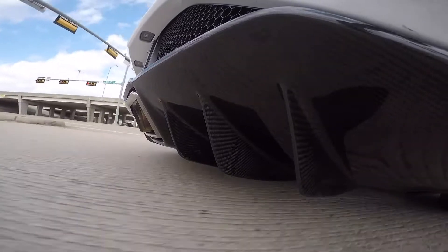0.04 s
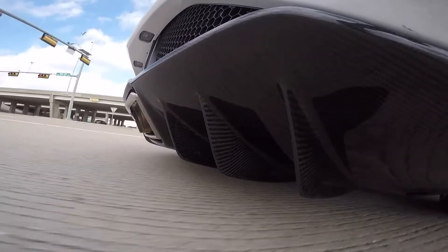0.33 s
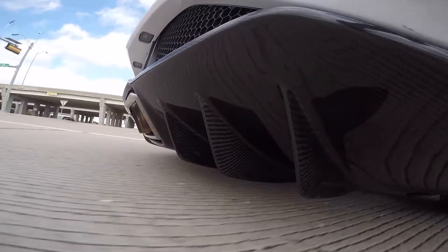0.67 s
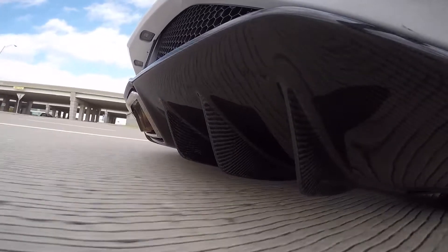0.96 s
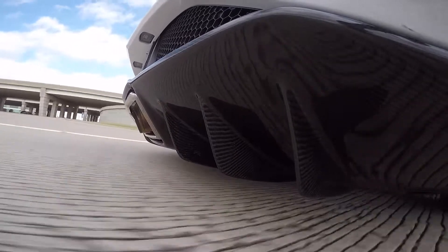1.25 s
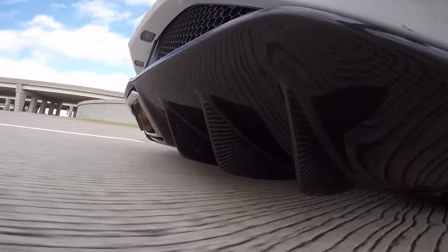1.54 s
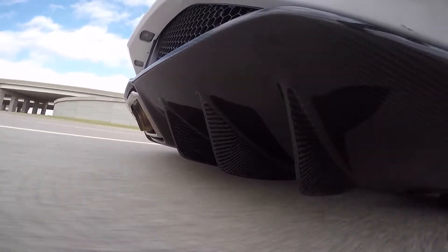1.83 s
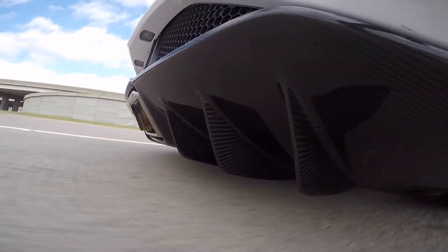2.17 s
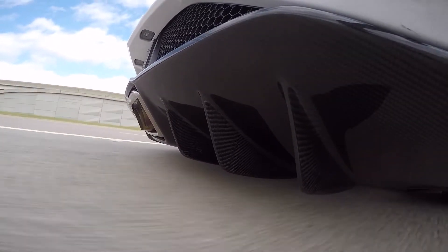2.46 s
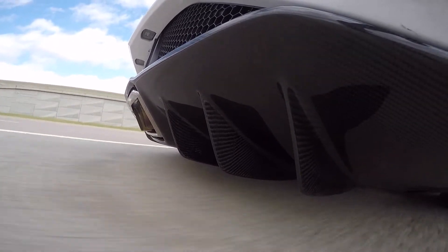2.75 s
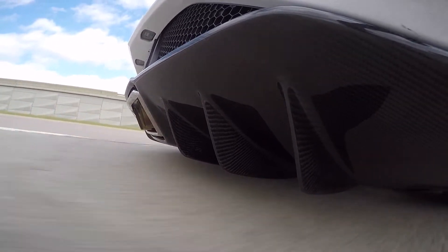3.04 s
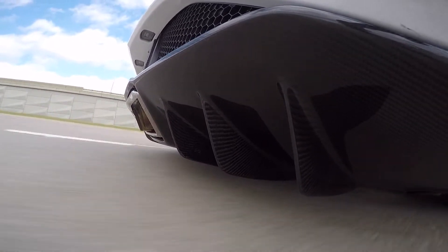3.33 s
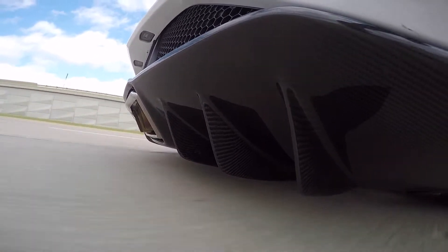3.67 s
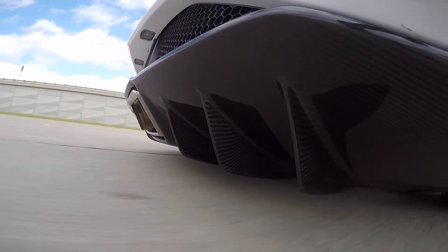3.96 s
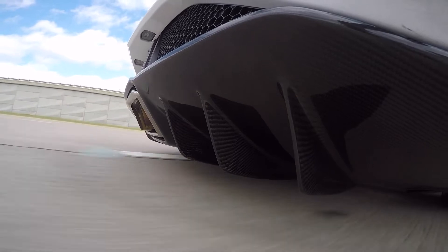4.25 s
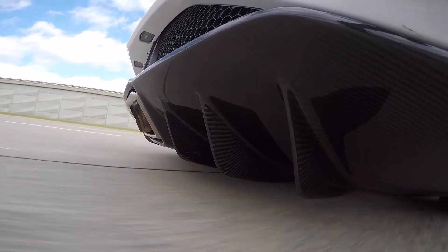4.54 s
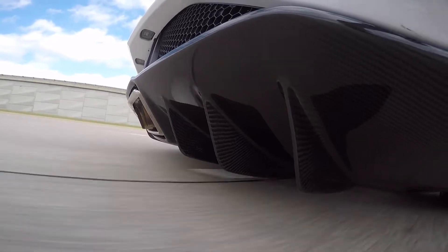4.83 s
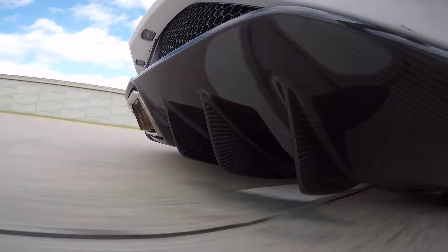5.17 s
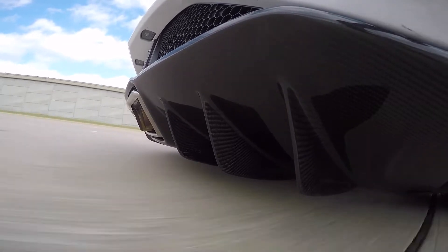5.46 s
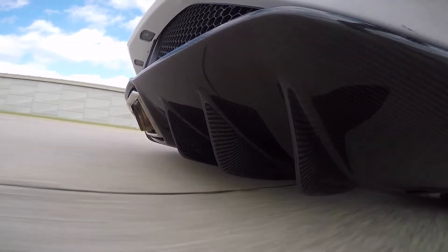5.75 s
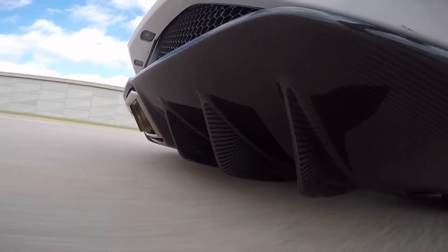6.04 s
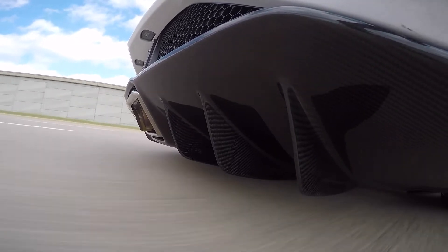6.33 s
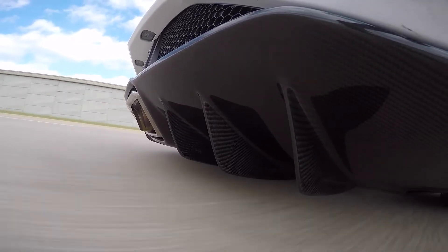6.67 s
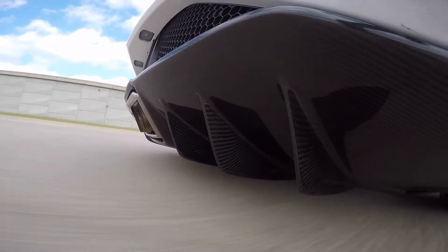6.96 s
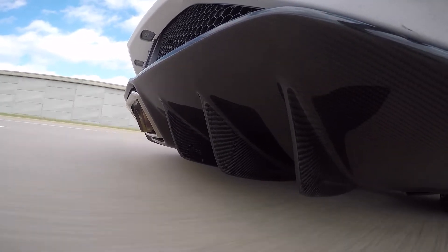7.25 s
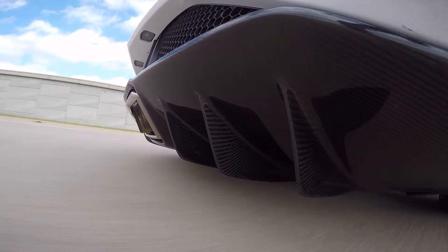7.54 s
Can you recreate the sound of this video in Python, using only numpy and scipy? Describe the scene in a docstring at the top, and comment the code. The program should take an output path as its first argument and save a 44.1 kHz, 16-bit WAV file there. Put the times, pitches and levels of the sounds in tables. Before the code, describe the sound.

A sports car accelerates hard on a concrete road, heard from its rear bumper beside the exhaust. The engine opens with a low growl and rises steadily into a loud, raspy howl over light wind and tyre noise. From about 2.5 to 2.8 seconds it stutters on the rev limiter, five quick cuts with thumps and sharp cracks, and the pitch drops with an upshift. It climbs again, stutters four times between 4.3 and 4.6 seconds, and shifts once more. A longer, slower rise follows, with brief low wind rumbles around 5.5 seconds. At 6.6 seconds a single thump and crack mark the third shift. Around 7 seconds the throttle closes, the rasp vanishes and the drone fades, returning only softly. Wind buffeting and tyre roar swell and dominate until the end near 8 seconds, with a thin, wavering gear whine.

```python
"""Twelve-cylinder sports car accelerating

The car pulls hard through three gears, heard from its tail beside the exhaust. One bank's firings
drone through the pipe and gas rasps out in step; road speed and gearing set the pitch throughout.
Twice the engine stutters on the rev limiter before a shift: each ignition cut thumps and each relight
cracks. At the end the throttle closes, and wind and tyre roar take over."""
import sys
import numpy as np
from scipy import signal
from scipy.fft import rfft, irfft
from scipy.io import wavfile
from scipy.ndimage import uniform_filter1d, minimum_filter1d

SR = 44100
rng = np.random.default_rng(int(sys.argv[2]) if len(sys.argv) > 2 else 0)


def pcm_store(signal):
    """Save signal as 16-bit PCM."""
    levels = np.round(np.clip(np.atleast_2d(signal), -1, 1) * 32767)
    wavfile.write(sys.argv[1], SR, levels.astype(np.int16).T)


N = 343980
T = np.arange(N) / SR
LIFT_S = 6.925  # the throttle starts to close

# road speed: t/s, v/(km/h)
ROAD_SPEED = [(0, 29.08), (.8, 39.5), (1.35, 49.7), (1.9, 60.9), (2.3, 72.8), (2.46, 77), (2.6, 77),
              (2.78, 74.0), (3.55, 91.5), (4.3, 108.3), (4.55, 105.8), (5.585, 122.5), (6.3, 133.7),
              (6.6, 136.4), (6.9, 139), (7.0, 134.5), (7.8, 136.3)]
# upshifts: t/s, firing rate per road speed in the new gear/(Hz per km/h)
UPSHIFTS = [(2.751, 3.55), (4.514, 2.7), (6.623, 2.2)]
# ignition cuts: cut t/s, relight t/s, thump level/dB, crack level/dB
IGNITION_CUTS = [(2.458, 2.483, 0.5, -2.5), (2.531, 2.568, -2, -0.5), (2.592, 2.654, -2, 3),
                 (2.674, 2.704, -3, 2.5), (2.748, 2.809, -7, 1), (4.298, 4.321, -0.5, -0.5),
                 (4.37, 4.419, -5, 3.5), (4.449, 4.497, -2.5, -1.5), (4.511, 4.548, -3.5, 0.5),
                 (6.624, 6.647, -0.5, 3)]
# exhaust pipe response: f/Hz, level/dB
PIPE_RESPONSE = [(30, -35), (60, -11), (90, -12.5), (125, -14), (170, -13.5), (240, -9.5), (350, -6),
                 (450, 0.5), (520, -8.5), (620, -18), (800, -13), (1100, -22), (1500, -36.5), (2200, -32)]


def drone(cycle, hz, sag, sag_db=-2.0, fall_db=-16, overrun_db=8.5, upper_share=0.44):
    """Periodic excitation: six firings a cycle give a fundamental and two overtones."""
    # strength of the fundamental: f/Hz, level/dB
    fundamental = [(145, -16.5), (163, -17.5), (192, -12.3), (225, -10.3), (245, -7), (275, -9), (320, -9),
                   (345, -10), (380, -9.9)]
    # strength of the overtones across the pipe's resonances: f/Hz, level/dB
    overtones = [(315, -22.5), (365, -12.5), (410, -13.5), (460, -15.5), (495, -19.5), (540, -28),
                 (590, -31), (650, -30.5), (700, -38), (800, -45), (1150, -44.5)]
    firing = 2 * np.pi * 6 * cycle
    # the drone fades after the lift and partly returns as the wheels drive the engine
    effort_db = sag_db * sag + fall_db * ramp(LIFT_S + 0.1, 0.17) + overrun_db * ramp(7.34, 0.19)
    tone = response(fundamental, hz) * undb(effort_db - 0.1 * walk(70)) * np.cos(firing)
    octave = response(overtones, 2 * hz) * undb(0.5 * walk(70)) * np.cos(2 * firing)
    twelfth = response(overtones, 3 * hz) * undb(0.5 * walk(70)) * np.sin(3 * firing)
    return np.sqrt(2) * (tone + undb(upper_share * effort_db) * (octave + twelfth))


def uneven_firing(cycle, hz, uneven_db, fifth_db=-20):
    """Period doubling: alternately early and late firings add lines at 1/2 and 3/2 the firing rate."""
    # boom at half the firing rate: f/Hz, level/dB
    boom = [(72, -23.5), (88, -17.5), (101, -21), (112, -30), (150, -26), (185, -22)]
    half = np.pi * 6 * cycle
    below = response(boom, hz / 2) * undb(walk(70)) * np.cos(half)
    above = response(PIPE_RESPONSE, 1.5 * hz) * undb(fifth_db + uneven_db + walk(70)) * np.cos(3 * half)
    return np.sqrt(2) * (below - above)


def burble(cycle, cycle_hz):
    """Source and filter: unequal cylinders add cycle harmonics, which swell at the pipe's resonances."""
    # engine orders: multiple of the cycle rate, level/dB
    orders = [(1, -15), (2, -15.5), (4, -21), (5, -19.5), (7, -25.5), (8, -30.5), (10, -23), (11, -22.5),
              (13, -26.5), (14, -32), (15, -26), (16, -23), (17, -26.5), (19, -34.5), (21, -31),
              (22, -28.5), (23, -29.5), (24, -24.5), (27, -24), (28, -22)]
    tilt_db = 0.3 * np.log2(cycle_hz / 56)  # high orders grow with the revs
    return sum(undb(db + k * tilt_db) * response(PIPE_RESPONSE, k * cycle_hz) * harmonic(cycle, k, 0.28)
               for k, db in orders)


def growl(cycle, cycle_hz, level_db=-34.5, hold_s=0.56, fade_db_per_s=86.5):
    """Beating: as the car pulls away, close harmonics beat at the cycle rate, then fade."""
    # orders under heavy load at low revs: multiple of the cycle rate, level/dB
    orders = [(16, -2.5), (17, 2.5), (19, -2), (21, -7.5), (22, -3.5), (23, -2.5), (24, -3), (25, -4.5)]
    # roll-off above the pipe's main resonances: f/Hz, level/dB
    rolloff = [(640, 4.5), (710, -1), (780, -22)]
    lines = sum(undb(db) * response(rolloff, k * cycle_hz) * harmonic(cycle, k, 0.091)
                for k, db in orders)
    return undb(level_db - fade_db_per_s * np.maximum(T - hold_s, 0)) * lines


def howl(cycle, hz, level_db=-35, db_per_octave=5.5, rough_db=2.5):
    """A repeating waveform has a comb spectrum; this rough one grows louder with the revs."""
    # envelope of the comb: f/Hz, level/dB
    envelope = [(450, -27.5), (650, 2), (800, -0.5), (1000, -7), (1250, -0.5), (1700, -11), (2200, -16.5),
                (3500, -37.5), (9000, -81)]
    first_gear_db = 3.5 * swell(1.87, 0.6)  # keenest in the first hard pull
    db = level_db + db_per_octave * np.log2(hz / 340) + first_gear_db
    return undb(db) * colour(repeating(cycle) * undb(rough_db * walk(110)), envelope)


def exhaust_gas(cycle, rasp_db, sizzle_db, puff=0.34, lope=0.13, spray_db=-14, flicker_db=0.78):
    """Modulated turbulence: gas puffs, strongest every second firing, ring the pipe and form a jet."""
    # lower cross modes of the tailpipe: f/Hz, bandwidth/Hz, level/dB
    rasp_modes = [(2346, 140, -4), (2944, 373, 6.5), (4410, 530, -14.5)]
    # upper cross modes: f/Hz, bandwidth/Hz, level/dB
    sizzle_modes = [(4374, 700, 0.5), (6195, 420, -4), (6563, 840, 5.5), (7420, 410, -5)]
    # spectrum of the jet: f/Hz, level/dB
    jet_spectrum = [(30, -13.5), (70, -1), (160, -4.5), (300, -3), (450, -1.5), (600, -4.5), (900, -15.5),
                    (1300, -13), (1800, -22.5), (2600, -16.5), (3700, -37.5), (8000, -52), (16000, -63)]
    # spectrum of its fine spray: f/Hz, level/dB
    spray_spectrum = [(3000, -9), (5000, 0), (8000, -4.5), (8800, -10.5), (9700, -1.5), (12000, -8.5),
                      (14000, -7.5), (16000, -18.5)]
    phase = 2 * np.pi * cycle
    gate = unit(np.exp(puff * np.cos(3 * phase) + lope * np.cos(phase)) * undb(0.5 * walk(130)))
    # each puff is partly fresh turbulence, partly the same as one cycle before
    puffs = gate * (noise() + 0.35 * repeating(cycle))
    rasp = undb(rasp_db + flicker_db * walk(40)) * ring(puffs, rasp_modes)
    sizzle_gain = undb(sizzle_db + flicker_db * walk(40))
    spray = undb(spray_db) * colour(gate * noise(), spray_spectrum)
    sizzle = sizzle_gain * (ring(puffs, sizzle_modes) + spray)
    return rasp + sizzle, colour(gate * noise(), jet_spectrum)


def firing_rate(first_gear=5.0, clutch_s=0.048, driveline_hz=2.6):
    """Firing rate is speed times gearing; each shift is a damped step response with slight undershoot."""
    gearing = old = first_gear  # Hz per km/h
    for start, new in UPSHIFTS:
        age = np.maximum(T - start, 0)
        transient = np.exp(-age / clutch_s) * np.cos(2 * np.pi * driveline_hz * age)
        gearing = gearing + (new - old) * (1 - transient)
        old = new
    return curve(ROAD_SPEED) * gearing


def driveline_sag(rebound=0.45):
    """Elastic rebound: effort sags after each shift, then surges as the driveline springs back."""
    return sum(swell(s + 0.14, 0.038) - rebound * swell(s + 0.24, 0.12) for s, _ in UPSHIFTS)


def engine_levels(hz, sag, open_s=0.37, close_s=0.16):
    """Timbre follows revs, load and throttle: levels in dB of rasp, sizzle and cylinder unevenness."""
    # engine voice: firing f/Hz, rasp level/dB, sizzle level/dB, unevenness level/dB
    voice = [(148, -36, -49.5, 0), (183, -31.5, -44, 0), (216, -38.5, -42.5, -4), (249, -33, -40.5, -3),
             (247, -35.5, -39, -4), (315, -34.5, -39, -1.5), (364, -32.5, -36.5, 0.35),
             (380, -33.5, -37, 0)]
    at_hz, *columns = np.transpose(voice)
    rasp, sizzle, uneven = (np.interp(hz, at_hz, db) for db in columns)
    opened, shut = ramp(0, open_s), ramp(LIFT_S, close_s)
    past_first_gear = T > UPSHIFTS[0][0]
    rasp = rasp - 2 * sag - 17 * shut
    sizzle = sizzle + 1.9 * past_first_gear - 4 * sag - 24 * shut
    uneven = uneven - 10 * (1 - opened) - 9 * shut
    return rasp, sizzle, uneven


def ignition(fade_s=0.0013):
    """Gating: 1 while the cylinders fire, decaying exponentially in each cut."""
    lit = np.ones(N)
    for cut, relight, _, _ in IGNITION_CUTS:
        inside = (T > cut) & (T < relight)
        lit[inside] = np.exp((cut - T[inside]) / fade_s)
    return uniform_filter1d(lit, size=48)


def overshoot(extra=0.78, settle_s=0.0038):
    """Transient gain: the first firings after a relight burn stored fuel and hit harder."""
    boost = sum(extra * (T > relight) * np.exp(-np.abs(T - relight) / settle_s)
                for _, relight, _, _ in IGNITION_CUTS)
    return 1 + uniform_filter1d(boost, size=48)


def surge(start, hz, length_s):
    """Damped oscillation: a brief swing of the gas column in the pipe."""
    age = np.maximum(T - start, 0)
    bloom = (age / length_s) ** 2
    return np.sin(2 * np.pi * hz * age) * bloom * np.exp(1 - bloom)


def thumps_and_cracks(level_db=-12, rise_s=0.0055, decay_s=0.0093):
    """Shock excitation: cuts and relights jolt the gas column; unburnt fuel cracks at each relight."""
    # spectrum of the crack: f/Hz, level/dB
    crack_spectrum = [(100, 0.5), (450, 9.5), (900, -7), (2000, -10), (2950, 0), (3600, -18.5), (4500, -9),
                      (5500, -21), (6700, -14.5), (8500, -27.5), (15000, -33)]
    swings, flash = 0, 0
    for cut, relight, thump_db, crack_db in IGNITION_CUTS:
        swings -= undb(thump_db) * surge(cut - 0.004, hz=68, length_s=0.013)
        swings -= undb(crack_db / 2 - 2) * surge(relight + 0.0029, hz=72, length_s=0.0082)
        age = np.maximum(T - relight, 0)
        flash += undb(crack_db) * 2 * (1 - np.exp(-age / rise_s)) * np.exp(-age / decay_s)
    crackle = colour(noise() * undb(1.5 * walk(500)), crack_spectrum)
    return swings + undb(level_db) * flash * crackle


def wind(level_db=-28, db_per_doubling=4, flutter_db=2.2):
    """Turbulent pressure buffets the tail, harder with speed; the low rumble swells at times."""
    # spectrum of the buffeting: f/Hz, level/dB
    buffet = [(15, -7), (28, -0.5), (50, 0), (90, -7), (170, -18), (400, -18.5), (1000, -57.5),
              (8000, -100)]
    # swells of rumble, the first over grooved concrete, the last two as the engine falls away:
    # t/s, half-width/s, level/dB
    swells = [(1.497, .3, 4), (5.52, .07, 6.5), (5.847, .1, 4), (6.4, .3, 4.5), (7.245, 0.17, 10.5),
              (7.701, 0.27, 11)]
    swell_db = sum(db * swell(s, width) for s, width, db in swells)
    rumble_db = level_db + db_per_doubling * np.log2(curve(ROAD_SPEED) / 100) + swell_db
    return colour(noise(), buffet) * undb(rumble_db + flutter_db * walk(14))


def tyres(grain_db=1.2):
    """Rolling noise: tyres on concrete radiate a broadband roar."""
    # spectrum of the roar: f/Hz, level/dB
    roar_spectrum = [(100, -2), (250, 4), (380, 9.5), (650, 3.5), (1000, -0.5), (1400, 0), (1900, -3),
                     (2400, -7.5), (3000, -5), (3600, -20.5), (4700, -16.5), (6000, -28.5), (9000, -38.5),
                     (15000, -52)]
    # course of the roar: t/s, level/dB
    roar_level = [(0, -32.5), (1.5, -41), (3, -32.5), (6.6, -30.5), (7.05, -32.5), (7.3, -24), (7.8, -20)]
    return colour(noise(), roar_spectrum) * undb(curve(roar_level) + grain_db * walk(30))


def gear_whine(hz_per_kmh=12.24, level_db=-37, wobble=0.0039):
    """Gear meshing: off the throttle a thin, unsteady tone sounds, its pitch proportional to speed."""
    # swells of the whine: t/s, half-width/s, level/dB
    swells = [(7.293, .08, 5), (7.676, 0.058, 11.5)]
    hz = hz_per_kmh * curve(ROAD_SPEED) * (1 + wobble * walk(80))
    phase = 2 * np.pi * np.cumsum(hz) / SR
    whine_db = level_db + sum(db * swell(s, width) for s, width, db in swells) + 2 * walk(25)
    return np.sqrt(2) * ramp(7.16, 0.077) * undb(whine_db) * np.sin(phase)


def harmonic(cycle, multiple, scatter):
    """One multiple of the engine cycle, randomly amplitude-modulated; rms near 1."""
    turns = (multiple * cycle + rng.random()).astype(np.float32)
    return np.sqrt(2) * (1 + scatter * walk(35)) * np.cos(2 * np.pi * turns)


def repeating(cycle, size=700):
    """Periodic noise: a ragged pressure pattern recurs with every engine cycle."""
    return unit(np.interp(cycle % 1 * size, np.arange(size), rng.standard_normal(size)))


def ring(x, modes):
    """Resonance: sum of steep band-passes; rms 1."""
    out = 0
    for hz, width, db in modes:
        b, a = signal.iirpeak(hz, hz / width, fs=SR)
        out = out + undb(db) * signal.lfilter(b, a, signal.lfilter(b, a, x))
    return unit(out)


def colour(x, points):
    """Filter by spectral multiplication; rms 1."""
    return unit(irfft(rfft(x) * response(points, np.arange(N // 2 + 1) * SR / N), N))


def response(points, hz):
    """Gain of a (f/Hz, level/dB) spectrum at the given frequencies."""
    f, db = np.transpose(points)
    return undb(np.interp(np.log(hz + 1e-9), np.log(f), db))


def noise():
    """White noise."""
    return rng.standard_normal(N)


def walk(rate):
    """Random wander through `rate` points a second; rms 1."""
    steps = rng.standard_normal(4096)
    return unit(np.interp(T * rate, np.arange(len(steps)), steps))


def curve(rows):
    """Linear interpolation of (t/s, value) rows."""
    return np.interp(T, *np.transpose(rows))


def ramp(start_s, length_s):
    """Linear rise from 0 to 1."""
    return np.clip((T - start_s) / length_s, 0, 1)


def swell(centre_s, width_s):
    """Gaussian rise to 1 and fall."""
    return np.exp(-((T - centre_s) / width_s) ** 2)


def undb(db):
    """Decibels to gain."""
    return np.exp(np.asarray(db) * np.log(10) / 20)


def unit(x):
    """Scale to rms 1."""
    return x / np.sqrt(np.mean(x ** 2))


def scene(unlit_tone_db=-14, unlit_gas_db=-11, jet_db=-29, jitter=0.0015):
    """Superposition of exhaust, wind, tyres and gears at the rear bumper."""
    hz = firing_rate()
    cycle_hz = hz / 6
    cycle = np.cumsum(cycle_hz * (1 + jitter * walk(90))) / SR  # engine cycles elapsed
    sag = driveline_sag()
    rasp_db, sizzle_db, uneven_db = engine_levels(hz, sag)
    lit, uneven = ignition(), undb(uneven_db)
    tones = drone(cycle, hz, sag) + uneven_firing(cycle, hz, uneven_db) + growl(cycle, cycle_hz)
    tones += uneven * (burble(cycle, cycle_hz) + howl(cycle, hz))
    hiss, jet = exhaust_gas(cycle, rasp_db, sizzle_db)
    # with the spark cut the pistons still pump a little air
    tones *= lit * overshoot() + (1 - lit) * undb(unlit_tone_db)
    rush = (hiss + undb(jet_db) * uneven * jet) * (lit + (1 - lit) * undb(unlit_gas_db))
    return (tones + rush + thumps_and_cracks() + wind() + tyres() + gear_whine())[None]


def record(dry, ceiling=0.87, release_s=0.045, top_hz=15600):
    """Peak limiting: the gain ducks on loud cracks and recovers; a low-pass then cuts the top."""
    excess = np.log(np.maximum(np.abs(dry[0]) / ceiling, 1))
    # each peak over the ceiling is held and fades away exponentially
    held = np.exp(np.maximum.accumulate(np.log(excess + 1e-12) + T / release_s) - T / release_s)
    gain = uniform_filter1d(minimum_filter1d(np.exp(-held), size=65), size=65)
    return signal.sosfilt(signal.ellip(10, 0.2, 80, top_hz, fs=SR, output="sos"), dry * gain)


dry = scene()
out = record(dry)
pcm_store(out)
```